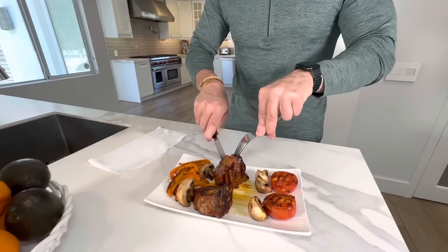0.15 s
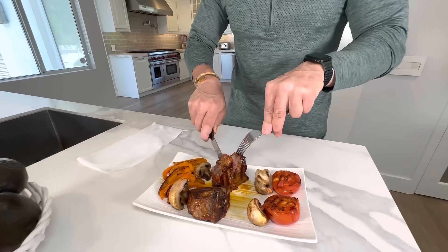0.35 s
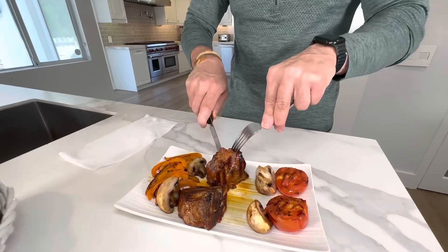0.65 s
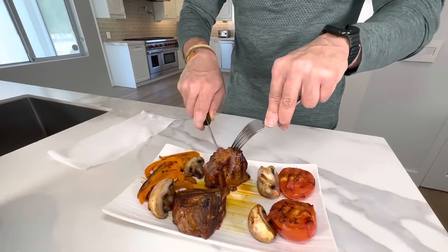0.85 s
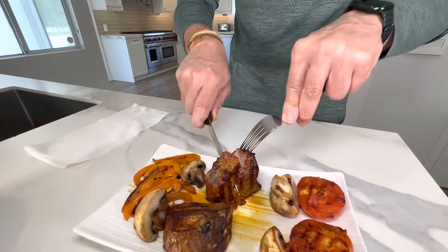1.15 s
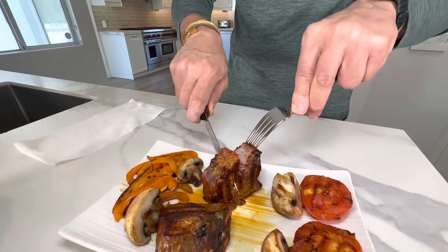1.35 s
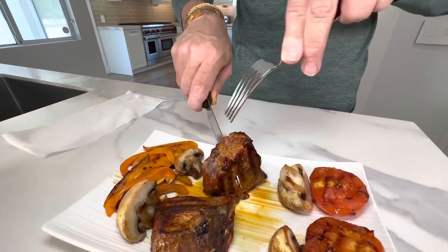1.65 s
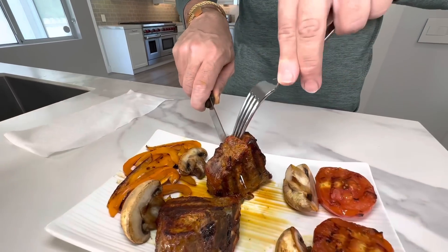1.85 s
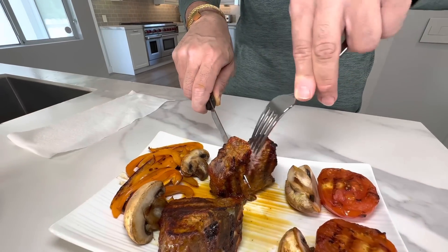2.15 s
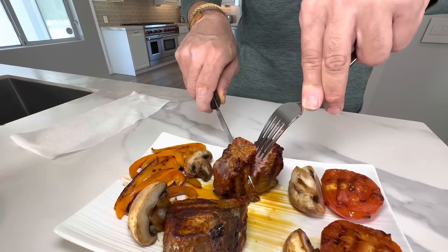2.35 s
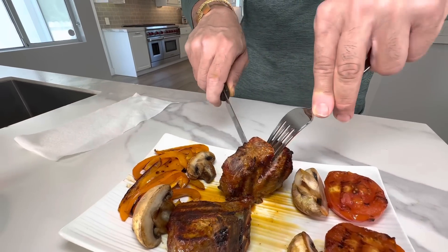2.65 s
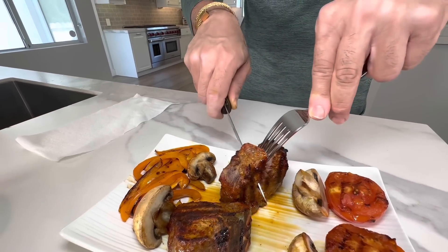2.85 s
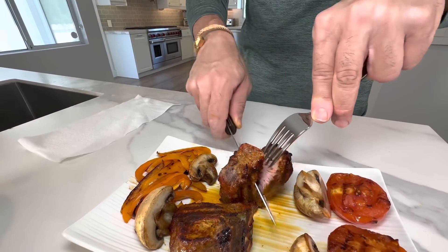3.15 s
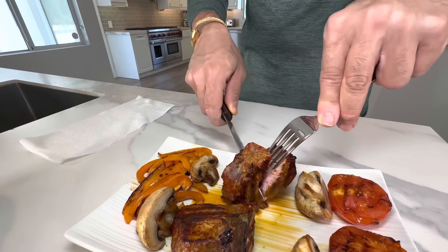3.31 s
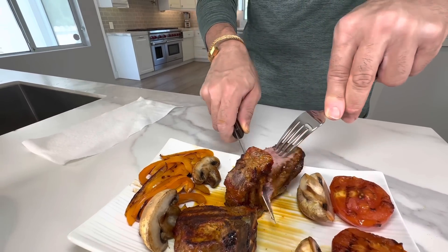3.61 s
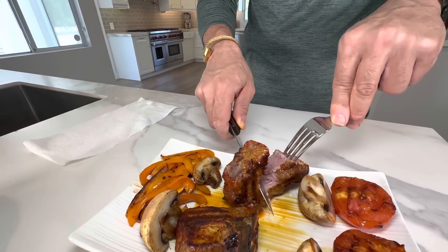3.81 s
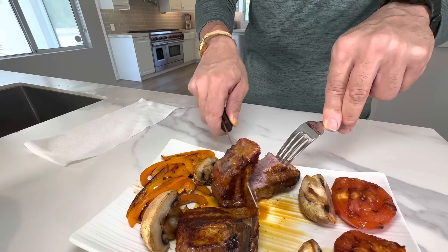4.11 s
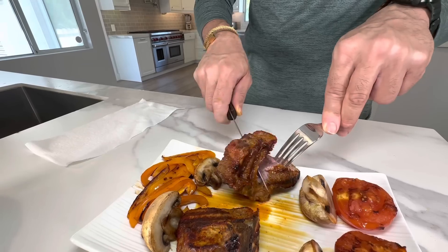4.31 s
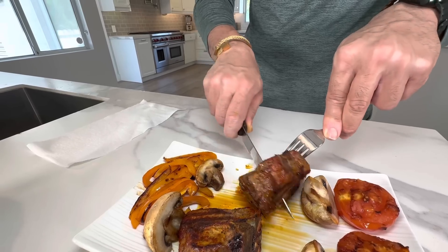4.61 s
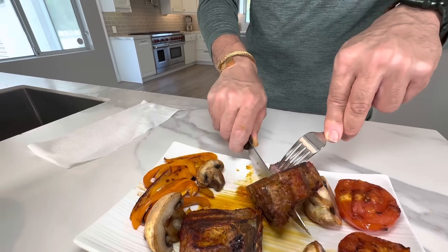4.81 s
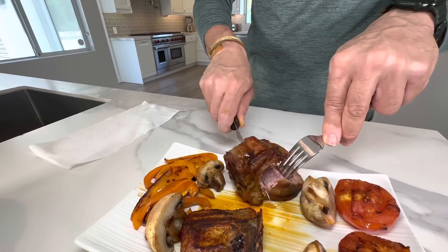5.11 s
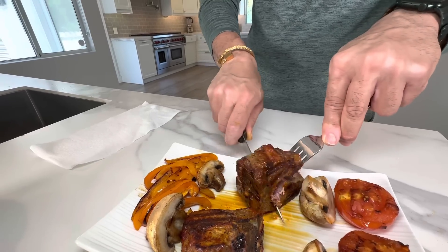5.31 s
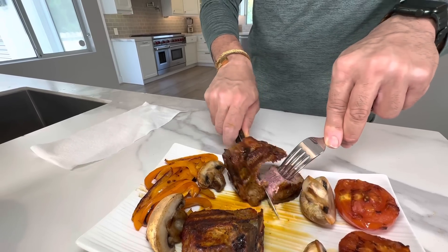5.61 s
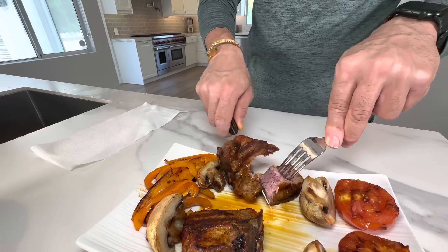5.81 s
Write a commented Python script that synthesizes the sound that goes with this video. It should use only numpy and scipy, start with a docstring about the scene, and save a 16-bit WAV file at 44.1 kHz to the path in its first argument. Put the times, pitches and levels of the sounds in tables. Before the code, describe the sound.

Irregular cutlery knocks ring a heavy plate briefly, with short damped tones and dull thuds. Between them come quiet stretches of faint hiss and tiny wet snaps from the meat. A sharp knock lands just after three seconds, and a ratcheting scrape builds toward the end. The sounds are near the microphone, slightly spread left and right, in a moderately reflective kitchen with soft appliance hum.

```python
"""Cutting meat on a ridged plate

A knife and fork cut meat on a ridged ceramic plate on a stone counter in a quiet kitchen.
Blows and the slips of the dragged blade excite damped plate modes; each blow or skip adds a clack of
shaped noise, and the drag adds a rasp.
Ridge skips are light blows; the meat is filtered hiss, fizz and snaps.
An appliance hums in narrow bands of noise over broadband air noise, and a decaying noise tail forms the room."""
import sys
import numpy as np
from scipy import signal
from scipy.fft import rfft, irfft
from scipy.io import wavfile
from scipy.ndimage import uniform_filter1d

SR = 44100
rng = np.random.default_rng(int(sys.argv[2]) if len(sys.argv) > 2 else 0)


def to_wav(s):
    """Save 16-bit WAV."""
    ch = np.atleast_2d(s).T  # columns
    pcm = np.round(np.clip(ch, -1, 1) * 32767)  # PCM
    wavfile.write(sys.argv[1], SR, pcm.astype(np.int16))


N = 262999


def gain_of(db):
    """Level to amplitude: 20 dB is a factor of ten."""
    return 10 ** (np.asarray(db) / 20)


def unit_rms(x):
    """Power normalisation: scales the signal to an rms of 1."""
    return x / np.sqrt(np.mean(x ** 2) + 1e-20)


def read(points, hz):
    """Logarithmic frequency scale: interpolates a curve evenly in pitch."""
    f, value = np.transpose(points)
    return np.interp(np.log(hz + 1), np.log(f + 1), value)


def sides(db):
    """Level difference between channels: left and right gains for a difference in dB."""
    return gain_of(np.array([db / 2, -db / 2]))


# Likeness of left and right in diffuse sound. Each row: frequency in Hz, correlation (no unit).
LIKENESS = [(60, 0.83), (200, 0.36), (550, 0.084), (2000, 0.18), (9000, 0.069), (15000, 0.36)]


def correlated(left, other, hz):
    """Spatial coherence: the right spectrum shares a frequency-dependent part of the left."""
    same = np.clip(read(LIKENESS, hz), -1, 1)[:, None]
    return np.array([left, same * left + np.sqrt(1 - same ** 2) * other])


def noise(tone, patchy_db, flicker_db, size):
    """Random short-time spectra: noise with uneven patches and a flicker common to all bins, rms 1."""
    frames, hz = 4 * N // size + 5, np.fft.rfftfreq(size, 1 / SR)
    a, b, c, d, patches = rng.standard_normal((frames, len(hz), 5)).T
    patches = uniform_filter1d(patches, size=6, axis=0)  # over frequency
    patches = unit_rms(uniform_filter1d(patches, size=8, axis=1))  # over time
    flicker = unit_rms(uniform_filter1d(rng.standard_normal(frames), size=3))
    spectra = correlated(a + 1j * b, c + 1j * d, hz)
    spectra *= gain_of(read(tone, hz)[:, None] + patchy_db * patches + flicker_db * flicker)
    return unit_rms(signal.istft(spectra, nperseg=size, noverlap=3 * size // 4)[1][:, :N])


# Colour of the air noise. Each row: frequency in Hz, relative density in dB per Hz.
AIR_COLOUR = [(15, -60.5), (25, -25.5), (55, 0.5), (92, -15.5), (134, -2), (200, -21.5), (236, -4.5),
              (476, -45), (2910, -45), (3720, -42), (4870, -46), (8140, -56.5), (16000, -40)]
AIR_DB = -62.5  # rms level
# Bands of the hum. Each row: centre in Hz, bandwidth in Hz, rms level in dB.
HUM_BANDS = [(128.3, 18, -63), (248.5, 17, -68.5), (332, 29, -73)]


def appliance():
    """Narrowband noise: slow random modulation makes each hum waver over steady air noise."""
    t = np.arange(N) / SR
    out = gain_of(AIR_DB) * noise(AIR_COLOUR, patchy_db=1.5, flicker_db=.6, size=2048)
    for hz, width_hz, db in HUM_BANDS:
        pole = np.exp(-np.pi * width_hz / SR)
        waver = signal.lfilter([1], [1, -pole], rng.standard_normal(N) + 1j * rng.standard_normal(N))
        hum = (waver * np.exp(2j * np.pi * hz * t)).real
        out += gain_of(db) * unit_rms(hum)
    return out


# Decay of the room. Each row: frequency in Hz, time to fall by 60 dB in seconds.
ROOM_DECAY = [(100, 0.46), (300, 0.57), (1000, 0.73), (2000, 0.61), (5000, 0.39), (12000, 0.13)]
# Strength of the room. Each row: frequency in Hz, reverberant level in dB.
ROOM_LEVEL = [(100, -5.5), (400, -8), (1100, -10.5), (2500, -6), (8000, -9.5)]


def kitchen(x):
    """Diffuse reverberation: sparse taps of random sign, each band decaying exponentially at its own rate."""
    taps = np.zeros((2, SR))
    # one tap at a random place in every 20 samples
    at = np.arange(200, SR - 20, 20) + rng.integers(0, 20, (2, (SR - 201) // 20))
    np.put_along_axis(taps, at, rng.choice([-1., 1.], at.shape), 1)
    hz, t, spectra = signal.stft(taps, SR, nperseg=512)
    spectra = correlated(spectra[0], spectra[1], hz)
    fade = gain_of(-60 * t / read(ROOM_DECAY, hz)[:, None])
    fade = fade / np.sqrt((fade ** 2).sum(1, keepdims=True))  # equal energy in every band
    fade = fade * gain_of(read(ROOM_LEVEL, hz))[:, None]
    tail = signal.istft(spectra * fade, SR, nperseg=512)[1] * np.sqrt(20 / 256)
    return signal.fftconvolve(x[:1], tail, axes=1)[:, :N]  # the left side feeds the room


# Course of the cutting. Each row: time in seconds, hiss level in dB, fizz level in dB.
CUTTING = [(0.0, -70, -83), (0.58, -74, -98), (1.05, -68, -79), (1.36, -70, -89), (1.74, -85, -101),
           (2.319, -67, -82.5), (2.62, -77, -99), (2.97, -53, -54.5), (3.22, -62, -82), (3.499, -57.5, -64),
           (3.739, -67, -68), (3.87, -79.5, -100), (4.5, -67, -93.5), (4.68, -61.5, -65),
           (5.08, -58, -83.5), (5.2, -68.5, -81), (5.36, -51, -60), (5.7, -71, -83), (5.96, -70, -89)]
# Colours of the hiss, then of the fizz. Each row within a colour: frequency in Hz, density in dB per Hz.
CUTTING_COLOURS = [
    [(1500, -0.5), (3500, -5), (5300, -8.5), (9000, -6.5), (11500, -7.5), (13000, -45)],
    [(11000, -46), (12800, 7), (14600, 7.5), (15800, -8.5)],
]


def meat_hiss():
    """Modulated noise: a grainy hiss and fizz whose levels follow the cutting."""
    s, *levels_db = np.transpose(CUTTING)
    out = np.zeros((2, N))
    for db, tone in zip(levels_db, CUTTING_COLOURS):
        level = gain_of(np.interp(np.arange(N) / SR, s, db))
        out += level * noise(tone, patchy_db=2.0, flicker_db=2.5, size=256)
    return out


# Wet snaps in the meat. Each row: start in seconds, peak in dB before panning, centre in Hz,
# left-right level difference in dB.
MEAT_SNAPS = [(1.1835, -29.5, 12300, 5), (1.935, -51, 10800, -6.5), (1.954, -56, 12900, 9),
              (2.2433, -47, 13600, -4.5), (2.346, -54.5, 5910, -6), (2.79, -51.5, 2600, 14),
              (2.8286, -47.5, 2320, -5), (2.899, -32.5, 12400, -8), (3.097, -45.5, 9000, -14),
              (3.1525, -45, 11000, 13), (3.38, -37, 11900, -2), (3.544, -45, 6520, -6.5),
              (3.8426, -48.5, 10220, -3.5), (4.0738, -56, 9000, -3), (4.2374, -49.5, 11930, 1.5),
              (4.256, -53, 10900, -17.5), (4.758, -46, 14070, -12), (4.817, -52, 11340, -12),
              (4.9666, -44.5, 5500, 7), (5.049, -40.5, 3330, 7), (5.3013, -42, 9800, -1),
              (5.8145, -42.5, 11700, -6)]


def meat_snaps(snap_s=0.0019, tail_s=0.014, tail_db=-13.0, width=1.7):
    """Band-limited impulses: short bursts of noise with a weaker, slower after-sizzle."""
    t, out = np.arange(2048) / SR, np.zeros((2, N))
    for s, db, hz, pan_db in MEAT_SNAPS:
        burst = rng.standard_normal(2048) * (np.exp(-t / snap_s) + gain_of(tail_db) * np.exp(-t / tail_s))
        band = [hz / width, min(hz * width, .45 * SR)]
        snap = signal.lfilter(*signal.butter(2, band, "band", fs=SR), burst)
        part = out[:, int(s * SR):][:, :len(t)]
        snap = gain_of(db) * sides(pan_db)[:, None] * snap / abs(snap).max()
        part += snap[:, :part.shape[1]]
    return out


# Phase of the plate's sound between the ports. Each row: frequency in Hz, lead of the left in radians.
PORT_LEAD = [(300, -0.27), (600, -2), (1050, 1.41), (2240, 2), (3600, -2.5), (5200, 2), (9000, 1)]
# Balance of the plate's sound. Each row: frequency in Hz, left-right level difference in dB.
PORT_BALANCE = [(60, -2.5), (150, 2.5), (380, 6.5), (950, 2.5), (2380, -2), (5980, 4.5), (15000, -7.5)]


def ports(hz):
    """Phase and level differences: how the plate's sound divides between two microphone ports."""
    lead = np.exp(.5j * np.multiply.outer([1, -1], read(PORT_LEAD, hz)))
    return lead * sides(read(PORT_BALANCE, hz))


# Blows on the plate. Each row: start in seconds, drive of the ring near 1.1 kHz in dB,
# weight (thud relative to the ring) in dB, hardness (treble relative to the ring) in dB.
PLATE_BLOWS = [(0.0186, -12.5, -12.5, -17), (0.028, -12.5, -21, -21.5), (0.0681, -30.5, -3.5, -14),
               (0.1215, -11.5, -14, -19), (0.1296, -6.5, -25.5, -26), (0.175, -28, -16, -15),
               (0.375, -47.5, 6, -20), (0.4314, -22.5, -11, -25), (0.6241, -43.5, 4.5, -22),
               (0.7339, -21, -8, -27), (0.8457, -14.5, -14, -17), (1.042, -17.5, -20.5, -22),
               (1.0599, -13.5, -10, -20), (1.0844, -37, 4, -15), (1.1204, -42, 4, -24),
               (1.4521, -4.5, -24.5, -26), (1.4894, -29, -14.5, -18), (1.6075, -52, 8, -22.5),
               (2.0755, -25.5, -4, -23.5), (2.1033, -38.5, 7.5, -15), (2.6477, -46, -14.5, -31.5),
               (2.6914, -47.5, -15, -30.5), (2.9488, -11.5, -13.5, -16), (2.9852, -29, 0, -10.5),
               (3.2401, -2.5, -24.5, -14), (3.2613, -27, -30, -22), (3.3221, -17, -10, -16.5),
               (3.3646, -26.5, -10, -28.5), (3.644, -38, 2, -30.5), (3.8563, -29, -9.5, -29.5),
               (3.9122, -28.5, -11.5, -37.5), (4.1375, -29.5, -11, -33.5), (4.4898, -14, -15, -15.5),
               (4.5053, -31, -2, -5), (4.5348, -31, -2, -16), (5.3545, -21, -30.5, -7),
               (5.69, -5, -40, -15.5), (5.6991, -24.5, -15, -12), (5.724, -52, -16, -1),
               (5.916, -8, -19.5, -13)]
# Skips of the blade over the ridges. Each row: start in seconds, drive near 3 kHz in dB.
RIDGE_SKIPS = [(5.3713, -30), (5.3879, -27), (5.4029, -26), (5.4211, -30), (5.4308, -26.5), (5.4419, -25.5),
               (5.4618, -39), (5.5024, -24.5), (5.5165, -39), (5.5266, -22.5), (5.5407, -26), (5.5629, -22),
               (5.5792, -24.5), (5.5915, -18.5), (5.6037, -19.5), (5.6201, -16), (5.6363, -18),
               (5.649, -26.5), (5.659, -26), (5.675, -15.5)]
SKIP_RING_DB, SKIP_WEIGHT_DB = -4.5, -23  # a light skip rings the plate and hardly stirs the bass


def impacts():
    """Impulsive contact: ridge skips take the same form as blows, with little weight."""
    skips = [(s, db + SKIP_RING_DB, SKIP_WEIGHT_DB, -SKIP_RING_DB) for s, db in RIDGE_SKIPS]
    return list(PLATE_BLOWS) + skips


# Frequencies in Hz of the deep thud, thud, low modes, ring, upper modes, treble and edge.
IMPACT_HZ = [110, 220, 650, 1150, 1750, 3000, 8000]
DEEP_DB, DEEP_SHARE = 6.0, 1.5  # heavy blows reach the counter's deepest mode
BODY_DB, BODY_SHARE = -0.5, 0.61  # the plate's low modes follow the weight
UPPER_DB, UPPER_SHARE = -9, 0.32  # the modes just above the ring follow the hardness
EDGE_DB, EDGE_SHARE = 2.5, 1.21  # soft blows lose the highest treble faster still


def landing(hz):
    """Contact spectrum: weight lifts the bass of each impact and hardness its treble, in dB."""
    levels = []
    for _, db, weight, hard in impacts():
        curve = [DEEP_DB + DEEP_SHARE * weight, weight, BODY_DB + BODY_SHARE * weight, 0,
                 UPPER_DB + UPPER_SHARE * hard, hard, EDGE_DB + EDGE_SHARE * hard]
        levels.append(db + np.interp(np.log(hz + 1), np.log(IMPACT_HZ), curve))
    return np.array(levels)


# Colour of the clack. Each row: frequency in Hz, level in dB added to the contact spectrum.
CLACK_COLOUR = [(50, -5), (110, 19.5), (300, 32), (1100, 21.5), (2000, 36), (3000, 24), (6000, 7),
                (10000, -6.5), (15000, -20.5)]


def clacks(rise_s=.0006, fall_s=0.0046):
    """Transient noise: every blow or skip starts with brief, dense chatter of plate, blade and stone."""
    t, hz, out = np.arange(2048) / SR, np.fft.rfftfreq(2048, 1 / SR), np.zeros((2, N))
    grains = rng.standard_normal((len(impacts()), 2048))
    grains *= (1 - np.exp(-t / rise_s)) * np.exp(-t / fall_s)
    grains /= np.linalg.norm(grains, axis=1, keepdims=True)
    colour = gain_of(landing(hz) + read(CLACK_COLOUR, hz))
    # the 256-sample roll leaves room for sound shifted ahead of the start
    for row, spectrum in zip(impacts(), rfft(np.roll(grains, 256, 1)) * colour):
        clack = irfft(spectrum * ports(hz))[:, 256:]
        part = out[:, int(row[0] * SR):][:, :clack.shape[1]]
        part += clack[:, :part.shape[1]]
    return out


# Drags of the blade over the glaze. Each row: start in seconds, strongest moment in seconds, end in seconds,
# peak drive in dB before the judder, brightness in dB an octave, power of the fade (small = abrupt end).
BLADE_STROKES = [(0.0, 0.003, 0.16, -28.5, -4.5, 2.6), (0.834, 1.065, 1.11, -29, 1.13, 0.97),
                 (5.083, 5.149, 5.21, -36.5, -1, 2.3), (5.355, 5.367, 5.398, -34, -5.5, 1.1),
                 (5.485, 5.646, 5.72, -28, -1.6, 0.87)]
SWELL = 1.12  # power of the rise to the strongest moment
JUDDER_DB, JUDDER_S = 2, 0.015  # rms depth and smoothing window of the wobbling pressure


def strokes():
    """Sliding friction: drive and brightness of the drag at every sample, silent between strokes."""
    t, level, bright = np.arange(N) / SR, np.zeros(N), np.zeros(N)
    for start, top, end, db, tilt, fade in BLADE_STROKES:
        rise = np.clip((t - start) / (top - start), 0, 1)
        fall = np.clip((end - t) / (end - top), 0, 1)
        level += gain_of(db) * rise ** SWELL * fall ** fade
        bright[(t > start) & (t < end)] = tilt
    judder = signal.oaconvolve(rng.standard_normal(N), np.hanning(int(JUDDER_S * SR) + 3), "same")
    return level * gain_of(JUDDER_DB * unit_rms(judder)), bright


# Colour of the blade's own rasp. Each row: frequency in Hz, relative density in dB per Hz.
RASP_COLOUR = [(2650, -40.5), (4500, -15), (9770, -15), (11800, -35.5), (12000, -7), (13100, -13.5),
               (15100, -32), (16000, -36.5)]


def rasp(level, bright):
    """Friction noise: high-pitched noise follows the drag and grows with its brightness."""
    grit = noise(RASP_COLOUR, patchy_db=1.5, flicker_db=1.0, size=256)
    return gain_of(-21.0 + 2 * bright) * level * grit


def blade_slips(level, slips_per_s=1500, spread_db=2.5):
    """Stick-slip: the drag is a random train of tiny impulses of either sign."""
    sizes = gain_of(spread_db * np.minimum(rng.exponential(1, N), 3.0))
    slips = sizes * (rng.random(N) < slips_per_s / SR)
    return level * unit_rms(slips) * rng.choice([-1., 1.], N)


# Modes of plate and counter. Each row: frequency in Hz, level in dB, time to fall by 60 dB in seconds,
# extra level when rubbed in dB.
PLATE_MODES = [(121, -8.5, 0.12, -14), (178.4, -0.5, 0.082, -15.5), (234, -4, 0.088, -25.5),
               (301, -7.5, 0.14, -28.5), (397, -3, 0.036, -14), (504.4, -4.5, 0.035, -9.5),
               (573, -1, 0.028, -17.5), (657.5, 2.5, 0.026, -10.5), (816, -11.5, 0.054, 4),
               (947, -10, 0.029, 7.5), (1063.4, -3.5, 0.064, 2.5), (1160.4, -1.5, 0.032, 7),
               (1285, -14, 0.12, 3.5), (1412, -11, .04, 2.5), (1646.6, 2.5, 0.04, -3),
               (1758, 2.5, 0.062, -9.5), (1854, -2.5, 0.024, -6), (2380, -2.5, 0.034, 0),
               (2552, -1.5, 0.035, -9), (3280, -17.5, 0.0067, -1), (3419, -5, 0.022, -8),
               (3912, -6, 0.01, -7.5), (4590, -18.5, 0.033, -3.5), (5306, -21, 0.017, 3),
               (5854, -19, 0.023, -0.5), (6546, -21.5, 0.038, 5), (7800, -37.5, 0.087, 8.5),
               (9570, -33, 0.046, 0)]


def plate(level, bright, vary_db=3.5, rise_s=0.00084, thud_s=0.004):
    """Modal resonance: impacts and blade slips ring the same damped modes."""
    at = (np.transpose(impacts())[0] * SR).astype(int)
    chance = rng.standard_normal((len(at), 2 * len(PLATE_MODES)))
    slips = blade_slips(level)
    out = np.zeros((2, N))
    for k, (hz, mode_db, t60, rub_db) in enumerate(PLATE_MODES):
        ring = 1000 ** (-1 / (t60 * SR))
        # the heavy counter's low modes swell in later than the plate's ring
        rise = np.exp(-1 / ((rise_s + thud_s * (100 / hz) ** 2) * SR))
        turn = np.exp(2j * np.pi * hz / SR)
        rubbed = slips * np.sqrt(1 - ring ** 2) * gain_of(rub_db + bright * np.log2(hz / 1100))
        drive = np.array([rubbed, rubbed])
        # each impact meets each mode with a random strength and sign
        drive[:, at] += gain_of(landing(hz) + vary_db * chance[:, 2 * k]) * np.sign(chance[:, 2 * k + 1])
        poles = np.convolve([1, -ring * turn], [1, -rise * turn])
        mode = signal.lfilter([1 - rise], poles, drive)
        out += gain_of(mode_db) * (mode * ports(hz)[:, None]).imag
    return out


def scene():
    """Superposition: the near sounds, their reverberation and the background add."""
    level, bright = strokes()
    meat = meat_hiss() + meat_snaps()
    near = plate(level, bright) + rasp(level, bright) + clacks() + meat
    return near + kitchen(near) + appliance()


EDGE_HZ = 16100  # upper band limit


def record(dry, dip_hz=12100, dip_q=5.9, cut_hz=60):
    """Output filtering: a bass cut, a treble dip, soft saturation of peaks and a band limit."""
    dipped = dry - .8 * signal.lfilter(*signal.iirpeak(dip_hz, dip_q, SR), dry)
    thinned = signal.sosfilt(signal.butter(2, cut_hz, "high", fs=SR, output="sos"), dipped)
    squeezed = 1.2 * np.tanh(thinned / 1.2)
    band_limit = signal.firwin(511, EDGE_HZ, window=("kaiser", 9), fs=SR)
    return signal.oaconvolve(squeezed, band_limit[None], "same")


dry = scene()
out = record(dry)
to_wav(out)
```